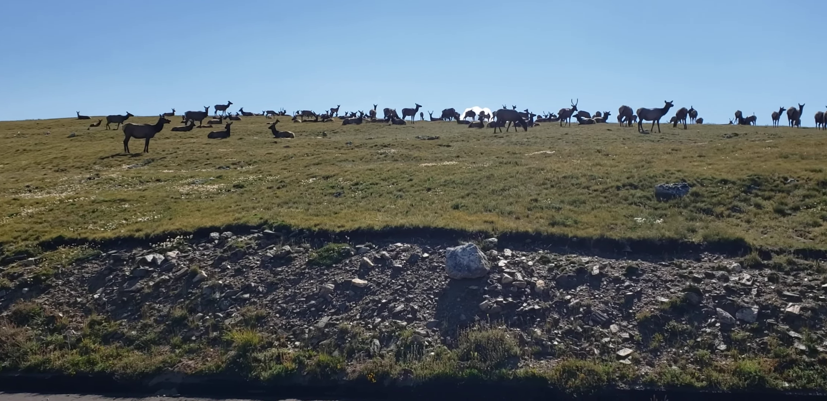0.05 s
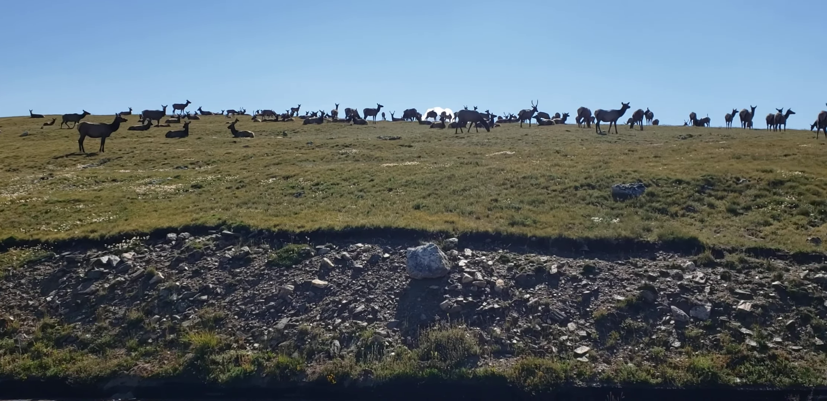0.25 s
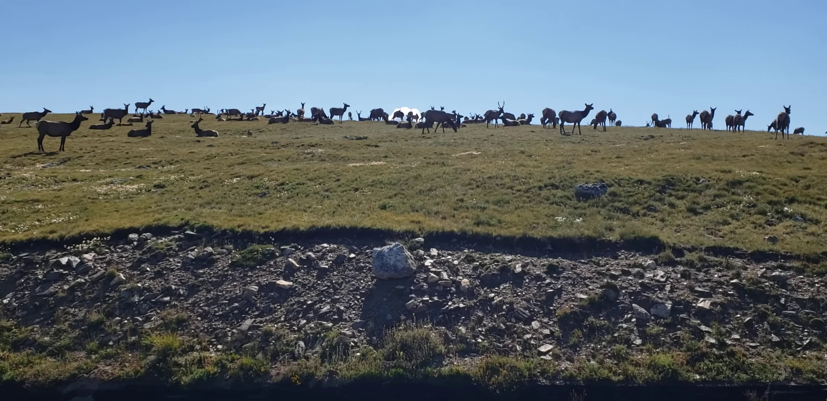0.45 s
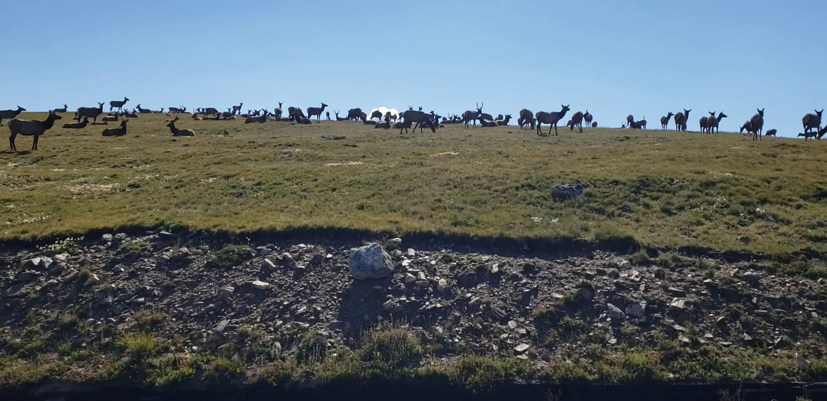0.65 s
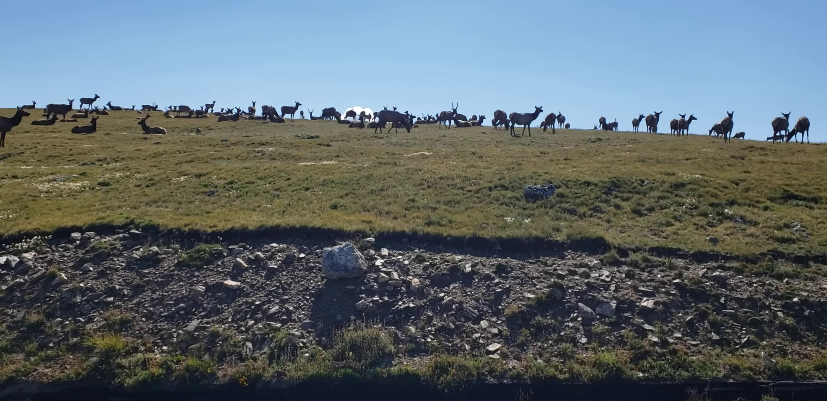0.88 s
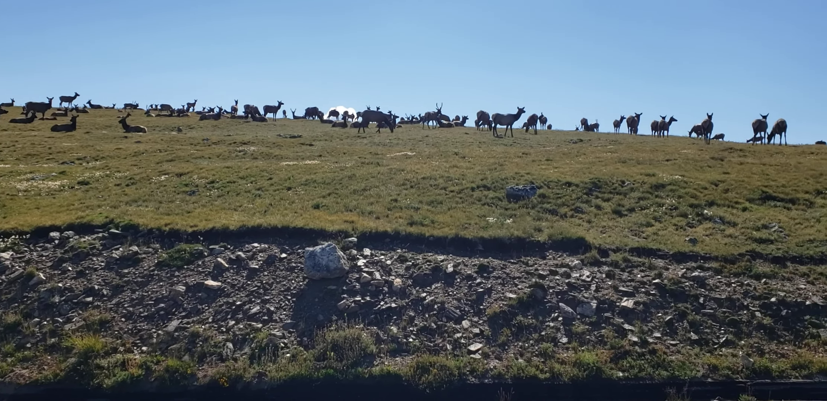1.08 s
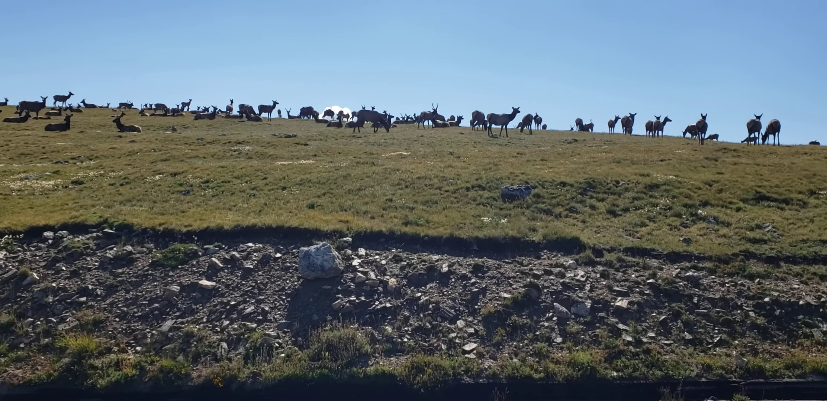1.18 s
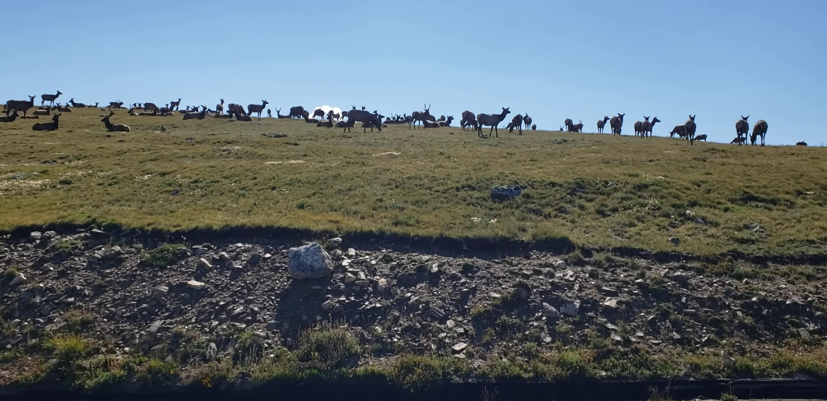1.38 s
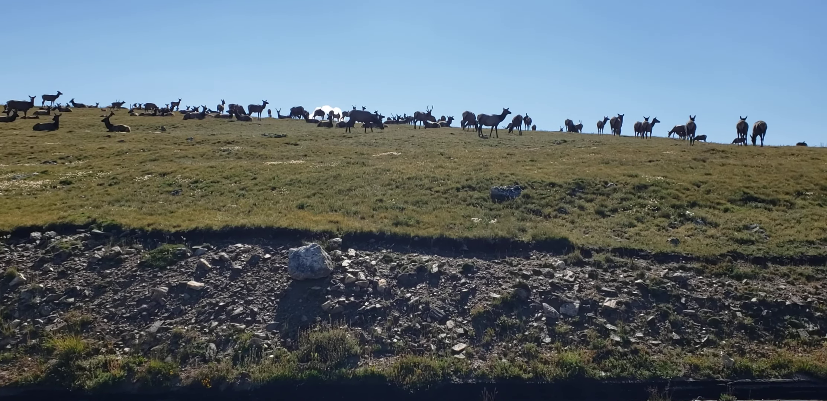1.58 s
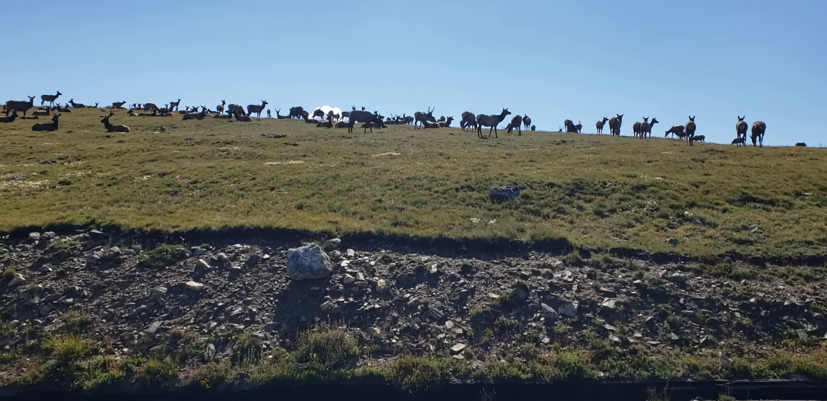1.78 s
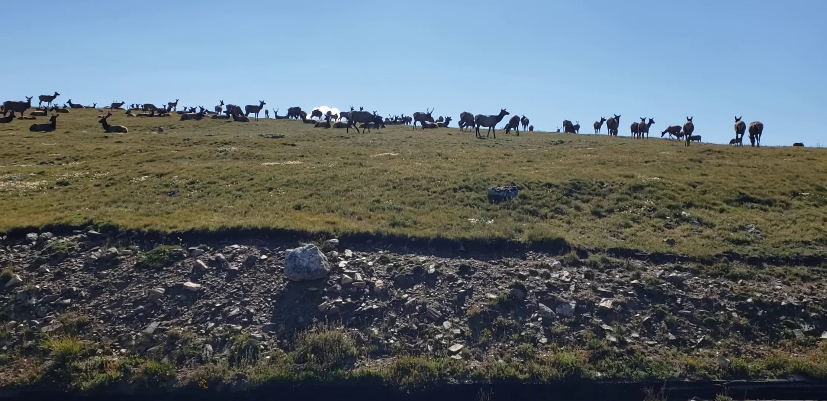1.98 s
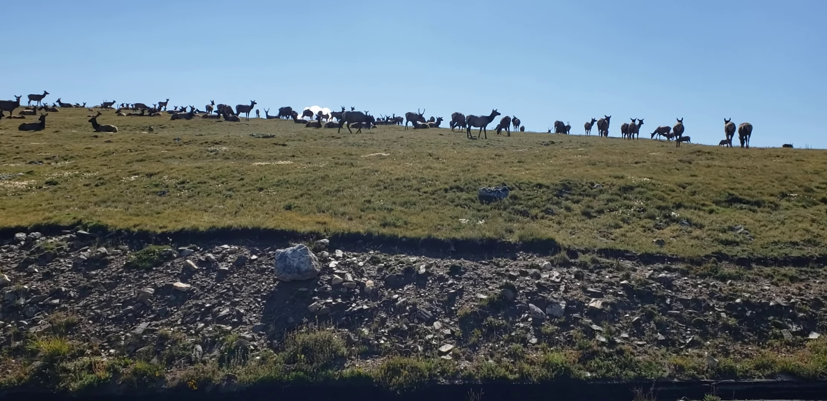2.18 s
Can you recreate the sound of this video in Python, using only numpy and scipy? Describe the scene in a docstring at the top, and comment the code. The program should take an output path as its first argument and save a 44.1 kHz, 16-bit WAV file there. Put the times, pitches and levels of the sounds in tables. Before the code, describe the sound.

Deep, uneven wind gusts hit a microphone at a car window in open mountain country, then weaken. The rolling car drones quietly underneath, and a distant vehicle's soft tyre noise grows on the right toward the end.

```python
"""Gusts buffet a two-port microphone at the window of a slowly rolling car on a mountain road:
each is a burst of turbulence, a deep rumble with a flutter on top. The car's engine hums underneath
and its body thumps once on a bump. The tyres of another vehicle draw nearer from the right with a
roar, a whirr and a thin hiss. In the lulls the bass drops out of the right side."""
import sys
import numpy as np
from scipy import signal
from scipy.fft import rfft, irfft
from scipy.io import wavfile

SR = 44100
rng = np.random.default_rng(int(sys.argv[2]) if len(sys.argv) > 2 else 0)


def wrap_up_sound(samples):
    """Save the sound to the file named by the first command line argument, as 16-bit audio."""
    columns = np.atleast_2d(samples).T
    # keep every value between -1 and 1, then stretch to whole-number steps
    tamed = np.clip(columns, -1, 1)
    steps = np.round(tamed * 32767).astype(np.int16)
    wavfile.write(sys.argv[1], SR, steps)


N = 99225
T = np.arange(N) / SR
HZ = np.fft.rfftfreq(N, 1 / SR)

# how alike the other vehicle sounds at the two ports: f/Hz, left-right likeness
VEHICLE_LIKENESS = [(300, 0.95), (800, 1), (1400, 0.89), (1600, 0.55), (4000, 0.32), (7000, 0.9)]


def wind():
    """Short buffets over a breeze; each drives a deep rumble and a higher flutter."""
    # buffets: centre t/s, length/s, relative level/dB, flutter send/dB, left minus right/dB
    buffets = [(0.399, 0.014, -47, -30, -13), (0.435, 0.011, -40.5, -8.5, -6),
               (0.499, 0.034, -35, -14, -7.5), (0.549, 0.02, -39.5, -6.5, 1.5),
               (0.579, 0.022, -38, 0, -7.5), (0.606, 0.012, -31, -10.5, -2), (0.649, 0.02, -30, -6, 0),
               (0.752, 0.055, -36.5, -14, -5), (0.796, 0.024, -30.5, -5, -4), (0.843, 0.011, -39.5, -10, 7),
               (0.9, 0.064, -49, -17, 22), (0.946, 0.015, -35, -12.5, -0.5), (0.989, 0.013, -41, -15, -24),
               (1.03, 0.035, -36.5, -14, -3), (1.073, 0.01, -41, -17, 4.5), (1.094, 0.03, -41.5, -8.5, 4),
               (1.149, 0.012, -45.5, -18, 23), (1.225, 0.027, -45.5, -20.5, 7), (1.28, 0.024, -46, -2.5, 1),
               (1.431, 0.052, -39, -18.5, -5), (1.547, 0.022, -55.5, -27, 7), (1.939, 0.015, -50.5, -4, 3),
               (1.987, 0.018, -48, -26, -6), (2.036, 0.0055, -50, -4.5, -26), (2.22, 0.019, -54.5, -4, -6)]
    # the breeze between them: t/s, relative level/dB
    breeze_level = [(0, -67.5), (.32, -61.5), (.47, -58), (.6, -46), (.69, -54), (.78, -46.5), (.88, -55),
                    (1.08, -55), (1.18, -62.5), (1.45, -59.5), (1.82, -66), (1.96, -60), (2.12, -71),
                    (2.25, -64)]
    # colours of rumble and flutter: f/Hz, relative level/dB
    rumble_colour = [(10, -35.5), (25, -13.5), (45, 6), (80, 2.5), (130, 1.5), (200, -17.5), (300, -21.5),
                     (450, -37), (900, -68.5), (2000, -92)]
    flutter_colour = [(50, -37), (130, 4), (200, 6), (310, -2), (420, -15.5), (600, -29.5), (1000, -55),
                      (2500, -63), (6000, -67)]
    # strong gusts push the ports against each other, light ones together: t/s, left-right likeness
    gust_likeness = [(.38, 0.31), (.64, -0.81), (.8, -0.2), (1.06, -0.58), (1.2, 0.62), (1.48, -0.47),
                     (1.95, 0.97)]
    rumble_power = amp(over_time(breeze_level)) ** 2
    flutter_power = rumble_power * amp(-9) ** 2
    for centre, length, level_db, flutter_db, pan_db in buffets:
        swell = np.exp(-abs(2 * (T - centre) / length) ** 2.07)  # bell-shaped
        sides = unit(amp([[pan_db], [0]]))
        power = (amp(level_db) * sides) ** 2 * swell
        rumble_power = rumble_power + power
        flutter_power = flutter_power + power * amp(flutter_db) ** 2
    rumble = amp(3) * np.sqrt(rumble_power) * eddies(rumble_colour, over_time(gust_likeness), 0.023)
    flutter = amp(-2) * np.sqrt(flutter_power) * eddies(flutter_colour, likeness=.1, eddy_s=0.0073)
    low_cut = signal.butter(2, 19.3, "high", fs=SR, output="sos")
    return signal.sosfilt(low_cut, rumble + flutter)


def eddies(colour, likeness, eddy_s):
    """Turbulence at each port, of even strength from one eddy to the next."""
    own, common = noise(colour, likeness=0)
    ports = np.array([blend(common, own, likeness), common])
    window = np.hanning(int(2 * eddy_s * SR))
    power = signal.fftconvolve(ports ** 2, window[None] / window.sum(), "same", axes=1)
    return ports / np.sqrt(abs(power) + 1e-6)


def engine():
    """The car's engine hums on one low note that wavers and throbs."""
    # swell of the hum: t/s, level/dB
    hum_level = [(0, -57), (.2, -50), (.32, -59), (1.3, -52), (1.9, -67.5), (2.1, -77.5), (2.25, -70.5)]
    note_hz, waver, throb = 65.6, 0.0782, 0.71
    cycles = np.cumsum(note_hz * (1 + waver * drift(rate_hz=10.7))) / SR
    hum = np.sin(2 * np.pi * cycles) * (1 + throb * drift(rate_hz=16))
    return amp(over_time(hum_level)) * unit(hum)


def body_thump():
    """The car's body takes a bump: one soft, low pulse, heavier on the right."""
    at_s, pitch_hz, width_s, sides_db = .255, 56, 0.0099, [[-37], [-31.5]]
    t = T - at_s
    envelope = 1 / np.cosh(np.clip(t / width_s, -20, 20)) ** 2
    return amp(sides_db) * envelope * np.cos(2 * np.pi * pitch_hz * t)


def tyres():
    """The other vehicle's tyres roar first; tread notes and a whirr join as it nears."""
    # the approach: t/s, relative roar level/dB, relative whirr and tread level/dB
    approach = [(0.1, -107, -99), (0.42, -93.5, -99), (0.77, -76.5, -92), (0.95, -83.5, -91.5),
                (1.22, -74.5, -88.5), (1.52, -73.5, -81.5), (1.62, -76, -83), (1.92, -71.5, -72.5),
                (2.06, -71.5, -77), (2.22, -68, -73)]
    # colours of roar and whirr: f/Hz, relative level/dB
    roar_colour = [(150, -20.5), (300, -6.5), (450, 4), (580, -0.5), (720, 5.5), (850, 7), (950, -1),
                   (1050, -11), (1400, -50)]
    whirr_colour = [(700, -14.5), (1000, 1.5), (1380, 3.5), (1560, -4.5), (1800, -8), (1950, -17),
                    (2500, -18.5), (4500, -20), (6000, -47.5)]
    # the tread sings in two narrow bands: f/Hz, width/Hz, relative level/dB
    tread_bands = [(844, 50, 6.5), (929, 54, -0.5)]
    # shading of the whirr between the ports: f/Hz, left minus right/dB
    whirr_shade = [(1000, 2), (1170, -2), (1400, 3.5), (1560, 7.5), (1750, -1.5), (2100, 16.5), (2500, -2),
                   (5000, 0)]
    likeness, lag_s = over_hz(VEHICLE_LIKENESS), 0.00039  # the left port hears the vehicle later
    roar = amp(4.5 + over_time(approach)) * noise(roar_colour, likeness, lag_s)
    rolling = rfft(noise(roar_colour, likeness, lag_s))
    tread = 0
    for hz, width, db in tread_bands:
        band = np.exp(-((HZ - hz) / width) ** 2)
        tread += amp(db) * unit(irfft(rolling * band, N))
    shade = amp(np.outer([.5, -.5], over_hz(whirr_shade)))
    whirr = amp(6) * irfft(shade * rfft(noise(whirr_colour, likeness, lag_s)), N)
    return roar + amp(over_time(approach, column=2)) * (tread + whirr)


def tyre_hiss():
    """A thin hiss on the right, whose whistling core fades more slowly with distance."""
    # swell of the hiss: t/s, relative level/dB
    hiss_level = [(0, -106), (.55, -99), (.85, -105), (1.06, -95), (1.22, -105), (1.56, -101),
                  (1.64, -86.5), (1.92, -75.5), (2.09, -83.5), (2.25, -73)]
    # colours of the hiss and its narrow core: f/Hz, relative level/dB
    hiss_colour = [(1500, -40), (3000, -22), (4550, -9), (5250, -4), (5800, -1), (6300, -1), (6900, -9),
                   (7200, -26), (9000, -51)]
    whistle_colour = [(5000, -39.5), (5500, -5), (5800, -5), (6100, -7.5), (6600, -41)]
    likeness, lag_s, sides_db = over_hz(VEHICLE_LIKENESS), 0.00024, [[-13.5], [5]]
    hiss_db = over_time(hiss_level)
    hiss = amp(hiss_db) * noise(hiss_colour, likeness, lag_s)
    whistle = amp(-26 + 0.71 * hiss_db) * noise(whistle_colour, likeness, lag_s)
    return amp(sides_db) * (hiss + whistle)


def cabin_drone():
    """The rolling car's cabin lays down a steady, dark bed."""
    # colour of the drone: f/Hz, relative level/dB
    cabin_colour = [(15, -11), (40, -2), (90, 5), (130, -5), (200, -8), (265, -3.5), (320, -8),
                    (370, -22.5), (480, -22), (650, -34.5), (1200, -36), (3000, -56.5)]
    return amp(-62.5) * noise(cabin_colour, likeness=0.73)


def bass_dropouts(ports):
    """The right side thins out for five set stretches in the lulls."""
    # stretches without bass: start t/s, end t/s
    gaps = [(0.86, 0.99), (1.128, 1.21), (1.305, 1.526), (1.593, 1.87), (2.049, 2.24)]
    corner_hz, depth_db, fade_s = 246, -33, 0.0071
    left, right = ports
    ramps = sum(np.clip(np.minimum(T - start, end - T) / fade_s + .5, 0, 1) for start, end in gaps)
    crossfade = np.sin(np.pi / 2 * ramps) ** 2
    low_cut = np.maximum(HZ ** 2 / np.hypot(HZ ** 2, corner_hz ** 2), amp(depth_db))
    thin = irfft(rfft(right) * low_cut, N)
    return np.array([left, right + crossfade * (thin - right)])


def microphone_hiss():
    """The microphone's steady noise floor, independent at each port."""
    # colour of the floor: f/Hz, relative level/dB
    floor_colour = [(100, 10.5), (1000, -7), (2000, -2), (4000, -4), (6000, -9), (7500, -12.5), (9000, -14),
                    (10300, -8), (11500, -2), (13000, -1), (15600, -1)]
    return amp(-76.5) * noise(floor_colour, likeness=0)


def amp(db):
    """Decibels to gain."""
    return 10 ** (np.asarray(db) / 20)


def unit(x):
    """Scales to rms 1."""
    return x / np.sqrt(np.mean(x ** 2) + 1e-20)


def over_hz(points):
    """Reads a table on a log-frequency axis."""
    hz, value = np.transpose(points)
    return np.interp(np.log(HZ + 1), np.log(hz + 1), value)


def over_time(rows, column=1):
    """Reads one column of a curve at every sample."""
    rows = np.array(rows)
    return np.interp(T, rows[:, 0], rows[:, column])


def blend(common, own, likeness):
    """Equal-power mix: likeness 1 gives the common signal, 0 the own, -1 the common inverted."""
    return likeness * common + np.sqrt(1 - likeness ** 2) * own


def noise(colour, likeness, lag_s=0):
    """Coloured noise of rms 1 at two ports, partly alike, the left one lagging."""
    common, own = rfft(rng.standard_normal((2, N)))
    left = blend(common, own, likeness) * np.exp(-2j * np.pi * HZ * lag_s)
    return unit(irfft(np.array([left, common]) * amp(over_hz(colour)), N))


def drift(rate_hz):
    """Slow random wander of rms 1."""
    return unit(irfft(rfft(rng.standard_normal(N)) * np.exp(-(HZ / rate_hz) ** 2), N))


def scene():
    """Wind, the rolling car and the nearing vehicle at the two ports."""
    return wind() + engine() + body_thump() + cabin_drone() + tyres() + tyre_hiss()


def record(dry):
    """The right side's bass drops out in the lulls; then microphone hiss and a steep high cut."""
    ports = bass_dropouts(dry) + microphone_hiss()
    high_cut = signal.firwin(511, 15700, window=("kaiser", 9), fs=SR)
    return signal.oaconvolve(ports, high_cut[None], "same")


dry = scene()
out = record(dry)
wrap_up_sound(out)
```